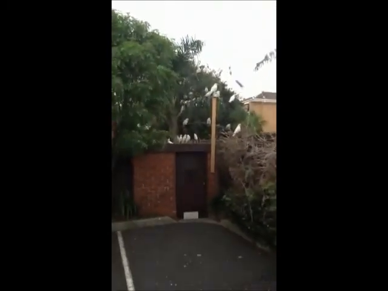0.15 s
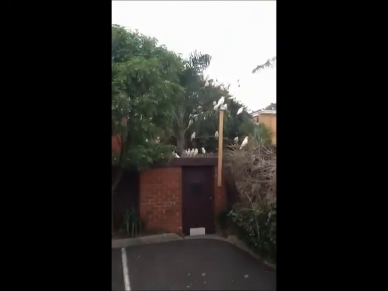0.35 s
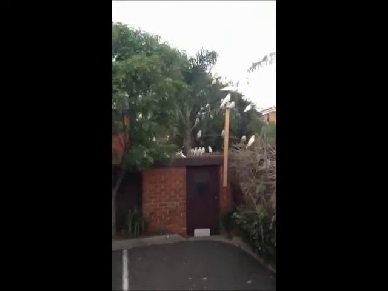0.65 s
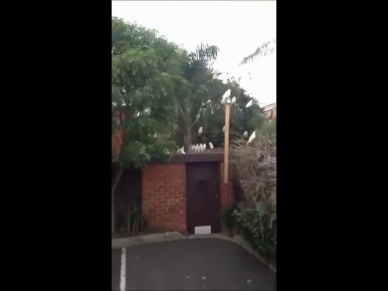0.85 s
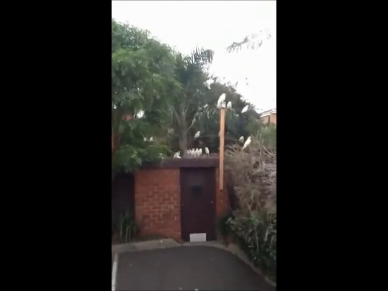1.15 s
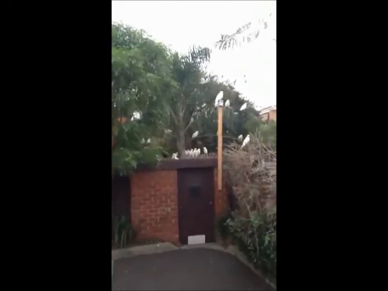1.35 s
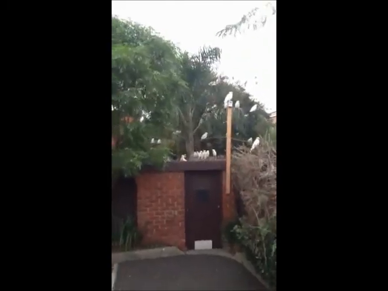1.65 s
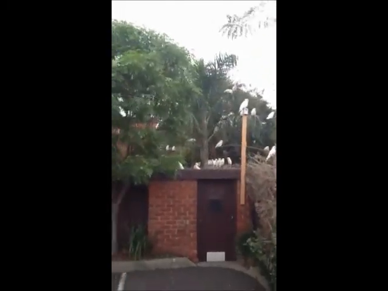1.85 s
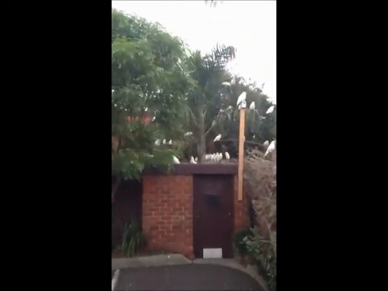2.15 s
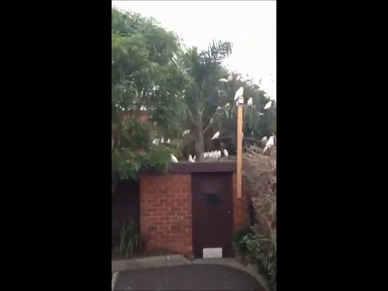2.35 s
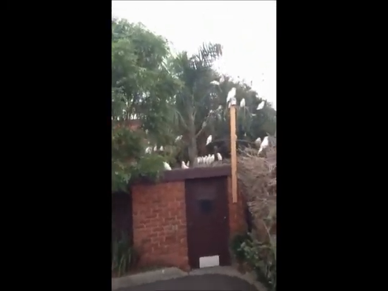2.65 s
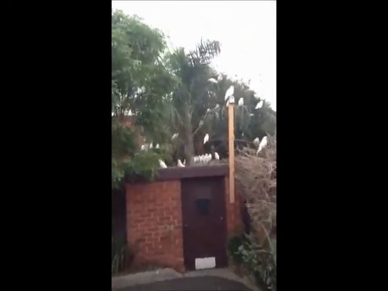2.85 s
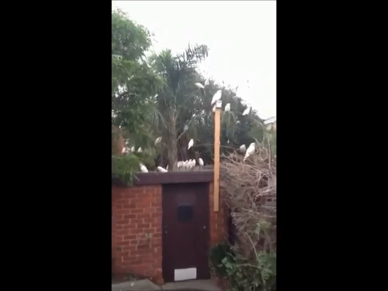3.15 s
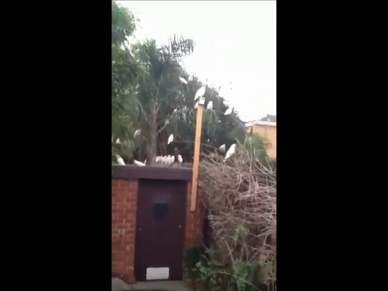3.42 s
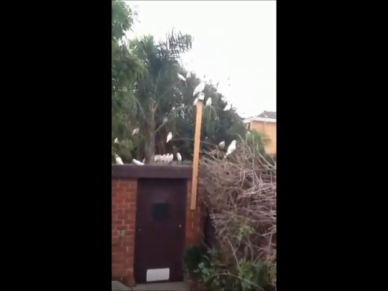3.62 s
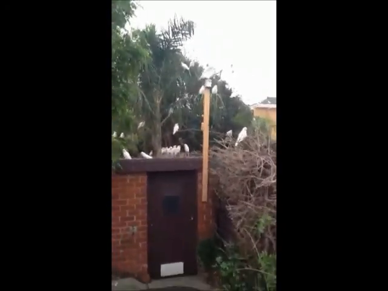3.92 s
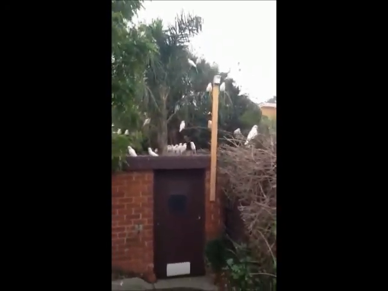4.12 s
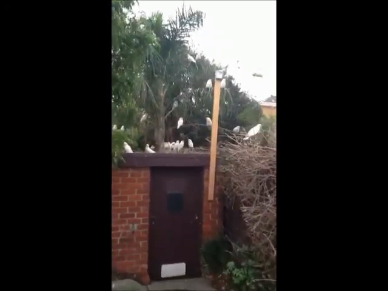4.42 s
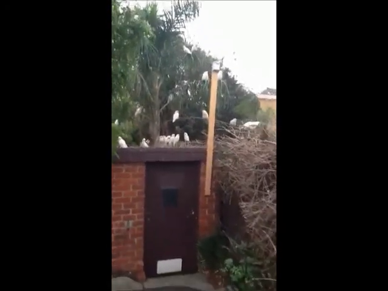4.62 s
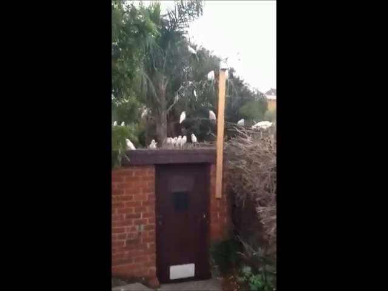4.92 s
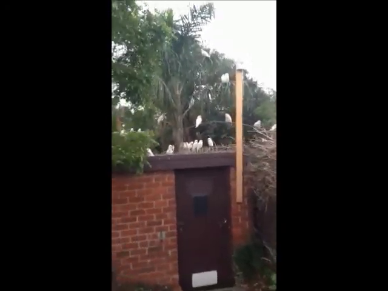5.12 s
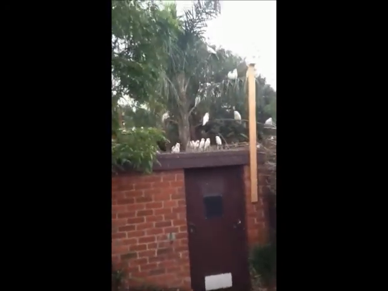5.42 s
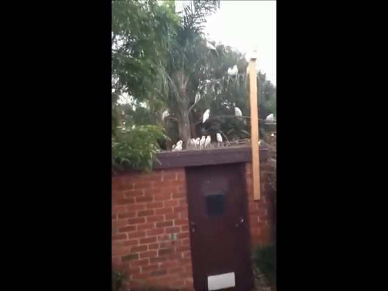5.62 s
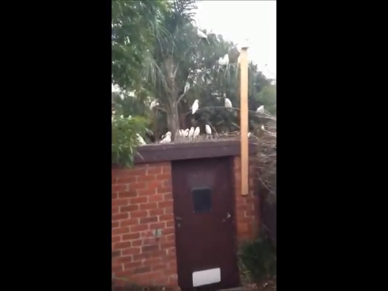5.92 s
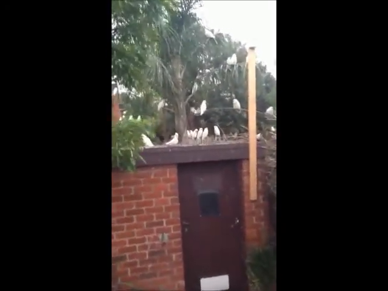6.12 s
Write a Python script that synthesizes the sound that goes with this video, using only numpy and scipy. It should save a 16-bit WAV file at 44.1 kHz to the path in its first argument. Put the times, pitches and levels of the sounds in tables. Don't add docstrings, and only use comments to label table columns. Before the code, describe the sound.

Outdoors by a brick wall and trees, a noisy cockatoo flock is already calling at the start. Three near voices, slightly different in pitch, squawk in short and longer warbling cries. Rasping screeches swell and become dominant past three seconds, then mixed cries continue to an abrupt end. Far birds babble continuously, with dull traffic rumble and a faint hum underneath, picked up by a small microphone.

```python
import sys
import numpy as np
from scipy import signal
from scipy.fft import rfft, irfft
from scipy.io import wavfile
from scipy.ndimage import uniform_filter1d

SR = 44100
rng = np.random.default_rng(int(sys.argv[2]) if len(sys.argv) > 2 else 0)


def voltage_ratio(decibels):
    exponent = np.asarray(decibels, float) / 20
    return 10 ** exponent


def to_wav(s):
    ch = np.atleast_2d(s).T
    pcm = np.round(np.clip(ch, -1, 1) * 32767)
    wavfile.write(sys.argv[1], SR, pcm.astype(np.int16))


N = 276507
THROAT_PEAK_HZ, TOP_HZ = 2300, 16700


# (start [s], length [s], pitch at start [Hz], pitch at end [Hz], level [dB])
POLE_CRIES = [(0, .289, 775, 712, -20.5), (.419, .07, 758, 750, -32), (.7, .368, 748, 745, -23.5),
              (1.074, .131, 788, 712, -23.5), (1.21, .08, 723, 790, -23), (1.838, .262, 760, 735, -23.5),
              (2.158, .072, 748, 732, -25.5), (2.345, .095, 725, 735, -32), (2.529, .04, 750, 742, -28),
              (2.775, .05, 728, 772, -28), (2.852, .055, 712, 765, -29), (3.012, .036, 735, 790, -33),
              (3.22, .18, 752, 742, -32), (3.879, .219, 775, 735, -21), (4.325, .085, 745, 755, -21),
              (4.719, .349, 775, 685, -17), (5.11, .06, 725, 715, -27), (5.175, .085, 715, 745, -26),
              (5.46, .08, 740, 732, -28), (5.545, .345, 731, 680, -20.5)]
# (time [s], rise [Hz], half width [s])
POLE_FLICKS = [(0, 52, .04), (.13, 32, .09), (.469, -28, .02), (.723, 50, .03), (.763, 55, .025),
               (.8, -12, .03), (.831, -20, .02), (.74, -25, .012), (.866, 48, .045), (.91, -50, .015),
               (.97, 73, .04), (1.045, 55, .045), (1.14, 14, .04), (1.07, -50, .016), (1.2, 70, .018),
               (1.255, 30, .03), (1.885, 85, .04), (1.96, 62, .028), (2.022, -35, .025), (2.345, 125, .04),
               (2.44, 90, .045), (3.885, 60, .04), (3.944, 15, .025), (3.986, -14, .03), (4.008, 35, .02),
               (4.06, 38, .03), (4.1, -32, .03), (4.37, 45, .035), (4.719, -15, .05), (4.79, 12, .035),
               (5.07, -26, .022), (5.735, 18, .06), (5.9, -45, .06)]
# (time [s], tilt [dB per octave])
POLE_BEAK = [(.15, -3.5), (0.451, -9), (.75, 0.5), (.9, 2), (1.1, 3.5), (1.2, 2.5), (1.26, 4.5), (1.95, -2),
             (2.2, -0.5), (2.55, 1), (2.83, -0.5), (3.03, 7), (3.3, -3), (4.0, 3.1), (4.35, 1.5), (4.72, 5),
             (4.8, 6), (4.93, 3), (5.051, 0.6), (5.2, 0.5), (5.65, 3)]


def pole_bird():
    return cries(POLE_CRIES, POLE_FLICKS, POLE_BEAK)


# (start [s], length [s], pitch at start [Hz], pitch at end [Hz], level [dB])
ROOF_CRIES = [(.09, .18, 705, 685, -30), (.43, .48, 665, 638, -29.5), (.735, .05, 735, 745, -26),
              (.84, .07, 735, 760, -26), (1.28, .1, 682, 720, -25), (1.399, .26, 700, 670, -24),
              (1.659, .211, 680, 672, -25), (1.885, .05, 770, 745, -25), (1.95, .1, 742, 722, -24),
              (2.08, .085, 745, 670, -27), (2.458, .045, 730, 722, -29), (2.535, .085, 735, 715, -25.5),
              (2.635, .115, 712, 722, -22.5), (3.879, .19, 668, 628, -40), (5.262, .2, 712, 705, -26),
              (5.62, .18, 705, 697, -24)]
# (time [s], rise [Hz], half width [s])
ROOF_FLICKS = [(1.362, 35, .02), (1.478, 50, .035), (1.575, 48, .04), (1.726, 100, .037), (1.803, 55, .02),
               (1.822, 65, .018), (2.482, -40, .025), (2.552, 28, .025), (5.425, 42, .085),
               (5.659, -36, .018), (5.73, 11, .06)]
# (time [s], tilt [dB per octave])
ROOF_BEAK = [
    (.18, -11),
    (.65, -2),
    (1.33, 0),
    (1.55, 2.5),
    (1.72, -1),
    (1.8, -3.5),
    (2.1, -4),
    (2.63, -9),
    (3.97, 3),
    (5.4, -3),
]


def roof_bird():
    return cries(ROOF_CRIES, ROOF_FLICKS, ROOF_BEAK)


# (start [s], length [s], pitch at start [Hz], pitch at end [Hz], level [dB])
TREE_CRIES = [(.499, .055, 835, 850, -24), (.938, .12, 878, 785, -29), (1.062, .08, 925, 900, -22.5),
              (1.29, .04, 820, 885, -22), (1.345, .065, 880, 885, -21), (1.429, .06, 862, 897, -27),
              (1.505, .06, 830, 770, -24), (1.609, .05, 872, 905, -23), (2.09, .05, 760, 860, -28),
              (2.565, .05, 826, 786, -27), (2.65, .105, 802, 800, -22), (4.175, .135, 745, 915, -18.5),
              (5.77, .08, 755, 764, -24), (5.879, .1, 690, 686, -21.5), (5.985, .11, 686, 683, -29),
              (6.14, .09, 810, 780, -21.5), (6.235, .035, 790, 930, -24)]
# (time [s], rise [Hz], half width [s])
TREE_FLICKS = [(.962, 18, .025), (.99, 135, .03), (1.062, -85, .028), (1.345, -60, .02), (1.372, 25, .03),
               (1.538, 115, .028), (2.645, 90, .035), (2.765, 50, .025), (4.2, -20, .02), (4.275, 30, .03),
               (5.784, 42, .028), (5.821, 45, .03), (5.925, 98, .07), (6.163, 55, .018), (6.19, 140, .022)]
# (time [s], tilt [dB per octave])
TREE_BEAK = [(.53, -5), (.99, 0), (1.1, 0), (1.46, -1), (1.53, -5), (2.6, -2.5), (4.26, -3.5), (5.8, -2),
             (5.93, 3), (6.03, 5), (6.2, 0)]


def tree_bird():
    return cries(TREE_CRIES, TREE_FLICKS, TREE_BEAK)


# (frequency [Hz], gain [dB])
CRY_THROAT = [(500, -38), (760, -19.5), (1100, -14.5), (1500, -15.5), (1880, -14.5), (2120, -7),
              (2400, -2.5), (2850, -10.5), (3150, -10), (3700, -15), (5000, -17), (7500, -24), (9500, -33),
              (15500, -51.5)]


def cries(calls, flicks, beak):
    out = np.zeros(N)
    for start, length, start_hz, end_hz, level_db in calls:
        at, t, done, ends = span_of(start, length, fade_s=.008)
        flick_hz = pushes(flicks, t)
        pitch_hz = start_hz + (end_hz - start_hz) * done + flick_hz
        pitch_hz = uniform_filter1d(pitch_hz, size=260, mode="nearest")
        effort_db = swell(done, length, attack_s=0.041, attack_db=2.5, release_s=0.049, release_db=1.5)
        effort_db = effort_db + 0.022 * flick_hz
        bright_db = np.interp(t, *np.transpose(beak))
        gape_db = 2.53 * max(level_db + 19.5, 0)
        voice = overtones(pitch_hz, CRY_THROAT, bright_db, wander=.04 * drift(85, size=len(at)),
                          flutter_db=3.0, count=22, low_db=-.5 * gape_db, gape_db=gape_db)
        throb_db = 1.7 * drift(45, size=len(at))
        rasp_db = 1.4 * drift(260, size=len(at))
        out[at] += voltage_ratio(level_db + effort_db + 3.2 + throb_db + rasp_db) * ends * voice
    return out


def overtones(pitch_hz, throat, bright_db, wander, flutter_db, count, low_db=0, gape_db=0):
    k = np.arange(1, count + 1)[:, None]
    hz = k * pitch_hz[::32]
    octaves = np.log2(hz / THROAT_PEAK_HZ)
    tilt_db = np.broadcast_to(bright_db, pitch_hz.shape)[::32] * np.maximum(octaves, 0)
    steadied = 1 - 0.68 * np.exp(-octaves ** 2 / 0.11)
    shimmer_db = flutter_db * steadied * flutter(36 * 32, count, hz.shape[1])
    beak_db = gape_db * np.exp(-(np.log2(hz / 3550) / .17) ** 2)
    gain_db = at_hz(throat, hz) + tilt_db + beak_db + shimmer_db + low_db * (k == 1)
    gain = voltage_ratio(gain_db) * (hz < TOP_HZ)
    gain = np.repeat(gain, 32, axis=1)[:, :len(pitch_hz)]
    gain = uniform_filter1d(gain, 32, axis=1)
    phase = 2 * np.pi * np.cumsum(pitch_hz) / SR + wander
    return np.sum(gain * np.sin(k * phase + rng.uniform(0, 2 * np.pi, (count, 1))), axis=0)


# (start [s], length [s], level [dB], attack [s])
SCREECHES = [(0.479, 0.45, -26, 0.18), (1.22, 0.28, -19.5, 0.05), (1.841, 0.24, -25, 0.076),
             (2.46, 0.47, -27, 0.069), (3.075, 0.4, -20.5, 0.22), (3.4, 0.5, -12.5, 0.19),
             (4.1, 0.32, -13, 0.055), (4.4, 0.2, -15, 0.033), (4.62, 0.174, -16.5, 0.042),
             (4.84, 0.57, -24.5, 0.018), (5.441, 0.66, -21, 0.046), (6.14, 0.27, -19.5, 0.086)]
SCREECH_CHAOS = [.7, .55, .7, .7, .4, .56, .6, .45, .62, .7, .82, .7]
# (pitch at start [Hz], pitch at end [Hz], slow beat [share of pitch], beat depth [0-1])
SCREECH_PITCH = [(1339, 1300, 0.47, 0.92), (832, 900, 0.73, 0.01), (779, 980, 0.19, 0.77),
                 (1109, 1300, .36, 0.44), (1360, 1285, 0.13, 0.46), (1174, 1105, 1 / 4, 0.92),
                 (1144, 1180, 1 / 2, 0.35), (1122, 1075, 1 / 2, 0.72), (731, 845, 0.4, 0.3),
                 (1062, 1180, 0.86, 0.36), (1199, 1080, 0.32, 0.25), (900, 710, 0.88, 0.04)]
# (throat shortening [ratio], brightness [dB per octave], lowest overtone [dB], beak ring [dB])
SCREECH_POSTURE = [(1.07, 1.5, -5, 7.5), (1, 0.5, -14.5, 3), (0.98, 5.5, -8.5, 6), (1.09, 0.5, -20, 4),
                   (1.15, -0.5, -12, 6), (1.01, 3.5, -8.5, 6.5), (0.985, 2, -7.5, 6.5),
                   (1.026, 0.5, -10, 9), (1.04, 3.5, -8, 6.5), (1.044, 3, -3, 4), (1.044, 3, -6, 6.5),
                   (1.06, 6, -5, 0)]
# (beak ring [Hz], windpipe ring [dB])
SCREECH_RINGS = [(4250, -2), (3500, -9), (4000, -4), (3800, -6), (3950, -3), (4280, -1), (3600, -1),
                 (4600, -1), (3900, -3), (4500, -3), (3600, -3), (3500, -5)]
# (time [s], gain [dB], half width [s])
SURGES = [(.87, 6.5, 0.099), (1.27, 0.5, 0.1), (1.39, 2.5, 0.028), (2.04, 6, 0.14), (2.525, 6, 0.08),
          (2.77, 5, 0.036), (3.62, -0.5, 0.06), (3.55, 3, 0.14), (4.23, -1.5, 0.12), (4.33, 2, 0.023),
          (4.5, -1.5, 0.058), (4.84, 5.5, 0.19), (5.24, 4, 0.088), (5.54, 1.5, 0.2)]
# (frequency [Hz], gain [dB])
SCREECH_THROAT = [(450, -20), (720, -5.5), (1140, -0.5), (1950, -13), (2300, 2), (2700, -3), (3400, -7.5),
                  (4150, -11), (4900, -12), (5900, -14), (7000, -18), (8100, -21.5), (10500, -32),
                  (15500, -50)]
# (frequency [Hz], gain [dB])
FLAT = [
    (100, 0),
    (20000, 0),
]


def screeches():
    out = np.zeros(N)
    for call, chaos, membranes, posture, rings in zip(
            SCREECHES, SCREECH_CHAOS, SCREECH_PITCH, SCREECH_POSTURE, SCREECH_RINGS):
        start, length, level_db, attack_s = call
        start_hz, end_hz, share, depth = membranes
        shorter, bright_db, low_db, gape_db = posture
        beak_hz, pipe_db = rings
        at, t, done, ends = span_of(start, length, fade_s=.015)
        size = len(at)
        effort_db = swell(done, length, attack_s, attack_db=10, release_s=0.095, release_db=6)
        effort_db = effort_db + pushes(SURGES, t)
        chaos = np.clip(chaos - .06 * effort_db + .07 * drift(7, size), 0, 1)
        pitch_hz = np.linspace(start_hz, end_hz, size) * (1 + 0.00626 * drift(16.0, size))
        beat = np.sin(2 * np.pi * np.cumsum(share * pitch_hz) / SR)
        beat = depth * voltage_ratio(.7 * drift(19.0, size)) * beat
        slip = 1.2 * chaos ** 2 * drift(148, size)
        source = overtones(pitch_hz, FLAT, 0, beat + slip, flutter_db=3.5, count=14, low_db=low_db)
        source = source * voltage_ratio(4.7 * chaos * drift(790, size))

        hz = np.maximum(np.arange(size // 2 + 1) * SR / size, 1)
        stretch = np.array([[1.035], [.965]])
        throat_db = at_hz(SCREECH_THROAT, hz / shorter / stretch)
        throat_db = throat_db + bright_db * np.maximum(np.log2(hz / THROAT_PEAK_HZ), 0)
        throat_db = throat_db + gape_db * np.exp(-(np.log2(hz / beak_hz / stretch) / .11) ** 2)
        throat_db = throat_db + pipe_db * np.exp(-(np.log2(hz / 1150) / .35) ** 2)
        drawn_in, stretched = irfft(rfft(source * ends) * voltage_ratio(throat_db), size)
        reach = np.clip(done + .25 * drift(15, size), 0, 1)
        voice = (1 - reach) * drawn_in + reach * stretched
        out[at] += voltage_ratio(level_db + effort_db - 3.0) * rms_one(voice)
    return out


# (time [s], level [dB], brightness [dB per octave])
CHORUS = [(0, -42, 3), (.35, -41.5, -0.5), (.7, -46, -5), (1, -42, 4), (1.7, -45, -3), (2.3, -42, -2),
          (3, -44, 0), (3.33, -46, 0), (3.5, -37, 3.5), (4, -43, -1.5), (4.301, -34, 2.5), (4.9, -42, 2),
          (5.4, -43, -4), (5.8, -38, -2), (6.27, -38.5, 3.5)]


def chorus(count):
    s, level_db, bright_db = np.transpose(CHORUS)
    out = np.zeros(N)
    for k, (late, long, high, fast, loud, turn) in enumerate(rng.random((count, 6))):
        start = (k + late) * (N / SR + .3) / count - .3
        at, t, done, ends = span_of(start, .15 + .3 * long, fade_s=.03)
        size = len(at)
        if size < 64:
            continue
        swing = .055 * turn * np.sin(2 * np.pi * ((9 + 5 * fast) * t + late))
        pitch_hz = (690 + 190 * high ** 1.8) * (1 - .07 * done + swing)
        wander = .18 * (drift(604, size) + 6.1 * drift(20.9, size))
        voice = overtones(pitch_hz, CRY_THROAT, np.interp(t, s, bright_db), wander,
                          flutter_db=8.0, count=20, low_db=-1.5)
        out[at] += voltage_ratio(5.2 * loud + 5.0 * drift(44, size)) * ends * voice
    even = out / np.sqrt(uniform_filter1d(out ** 2, size=9000) + 1e-9)
    return voltage_ratio(np.interp(np.arange(N) / SR, s, level_db) + 13.5) * even


def scatter(x, t60, dull_hz):
    t = np.arange(SR // 2) / SR
    tail = rng.standard_normal(len(t)) * voltage_ratio(-60 * t / t60) * (t > .006)
    tail = signal.lfilter(*signal.butter(1, dull_hz, fs=SR), tail)
    return signal.fftconvolve(x, tail / np.sqrt(np.sum(tail ** 2)))[:N]


# (frequency [Hz], density [dB per Hz])
TRAFFIC = [(18, -61), (30, -32.5), (188, -1), (244, -3.5), (335, -2.5), (393, 1.5), (472, -11.5),
           (560, -13), (730, 7), (1230, -120)]
# (frequency [Hz], level [dB rms])
HUM = [
    (209.9, -66),
    (312.2, -63.5),
]


def traffic():
    hz = np.maximum(np.arange(N // 2 + 1) * SR / N, 1)
    rumble = rms_one(irfft(rfft(rng.standard_normal(N)) * voltage_ratio(at_hz(TRAFFIC, hz)), N))
    out = voltage_ratio(-52) * rumble
    for hum_hz, level_db in HUM:
        phase = 2 * np.pi * hum_hz * np.arange(N) / SR + 1.4 * drift(3.7, size=N)
        out = out + voltage_ratio(level_db + 2.5) * np.sin(phase)
    return out


def span_of(start, length, fade_s):
    first = max(int((start - fade_s) * SR), 0)
    last = min(int((start + length + fade_s) * SR), N)
    at = np.arange(first, last)
    t = at / SR
    to_edge = np.minimum(t - start + fade_s, start + length + fade_s - t)
    ends = np.clip(to_edge / (2 * fade_s), 0, 1)
    return at, t, np.clip((t - start) / length, 0, 1), np.sin(ends * np.pi / 2)


def swell(done, length, attack_s, attack_db, release_s, release_db):
    attack = attack_db * np.maximum(1 - done * length / attack_s, 0)
    release = release_db * np.maximum(1 - (1 - done) * length / release_s, 0)
    return -attack - release


def pushes(rows, t):
    out = np.zeros(len(t))
    for s, height, width in rows:
        near = np.maximum(1 - np.abs(t - s) / width, 0)
        out += height * np.sin(np.pi / 2 * near) ** 2
    return out


def drift(rate_hz, size):
    r = np.exp(-2 * np.pi * rate_hz / SR)
    noise = rng.standard_normal(size + 4000)
    return rms_one(signal.lfilter([1], [1, -2 * r, r * r], noise)[4000:])


def flutter(rate_hz, count, size):
    knots = rng.standard_normal((count, 300))
    return np.array([np.interp(np.arange(size) * rate_hz / SR, np.arange(300), row) for row in knots])


def at_hz(points, hz):
    points_hz, points_db = np.transpose(points)
    return np.interp(np.log(hz), np.log(points_hz), points_db)


def rms_one(x):
    return x / np.sqrt(np.mean(x ** 2) + 1e-20)


def scene():
    near = pole_bird() + roof_bird() + tree_bird() + screeches()
    far = chorus(count=85)
    wet = scatter(voltage_ratio(-15) * near + voltage_ratio(-3.5) * far, t60=.32, dull_hz=5000)
    low_cut = signal.butter(4, 460, "high", fs=SR, output="sos")
    birds = signal.sosfilt(low_cut, near + voltage_ratio(-6.5) * far + wet)
    return (birds + traffic())[None]


def low_pass(x):
    return signal.sosfilt(signal.butter(12, 15480, fs=SR, output="sos"), x)


def record(dry):
    x = dry + voltage_ratio(-63) * rng.standard_normal(dry.shape)
    x = 1.5 * np.tanh(x / 1.5)
    x = signal.sosfilt(signal.butter(2, 60, "high", fs=SR, output="sos"), x)
    x = signal.sosfilt(signal.cheby2(10, 60, TOP_HZ, fs=SR, output="sos"), x)
    return low_pass(x)


dry = scene()
out = record(dry)
to_wav(out)
```